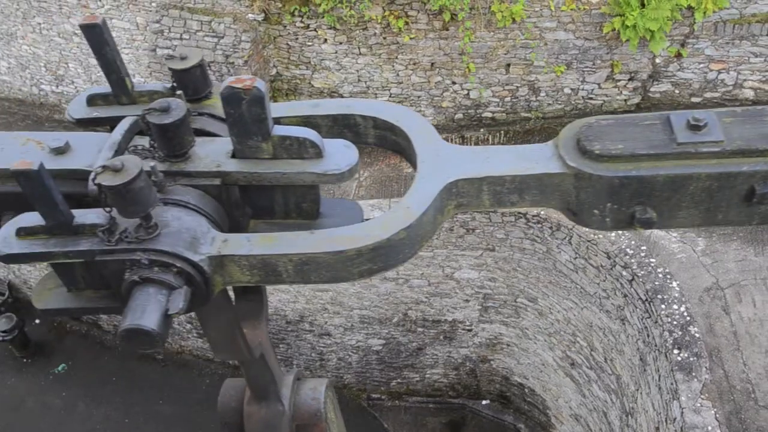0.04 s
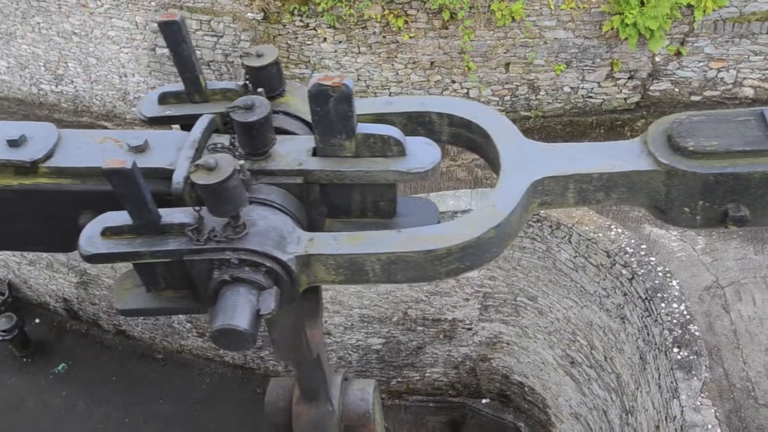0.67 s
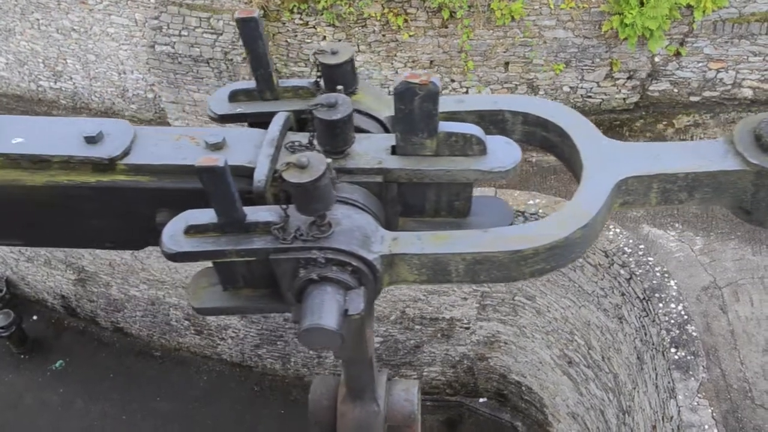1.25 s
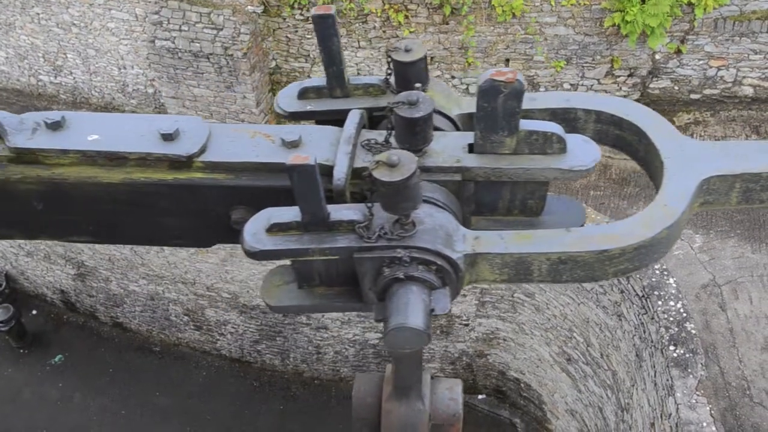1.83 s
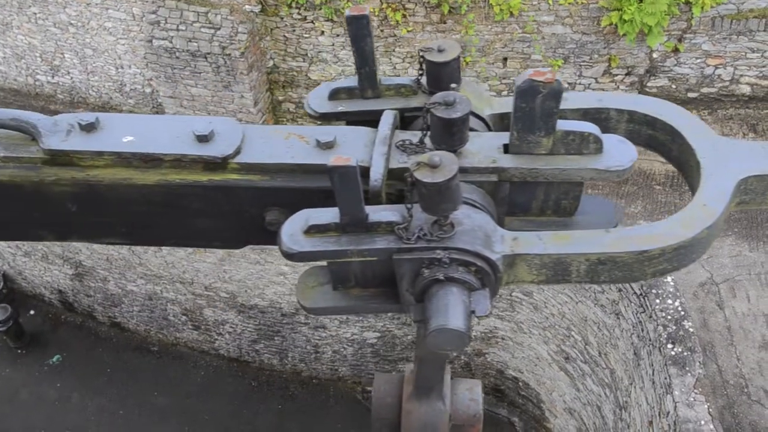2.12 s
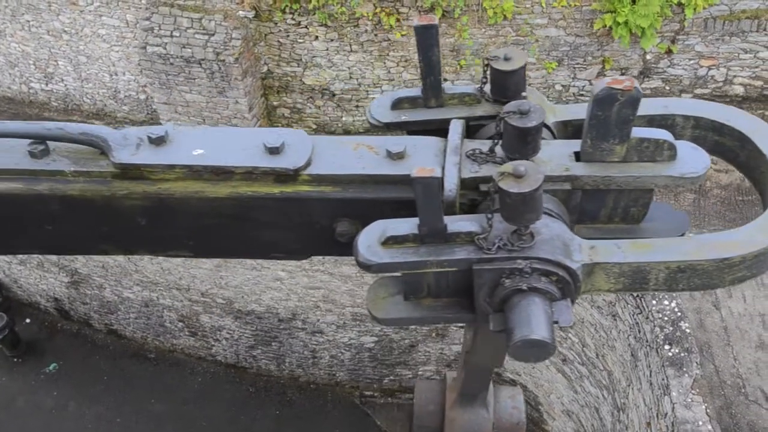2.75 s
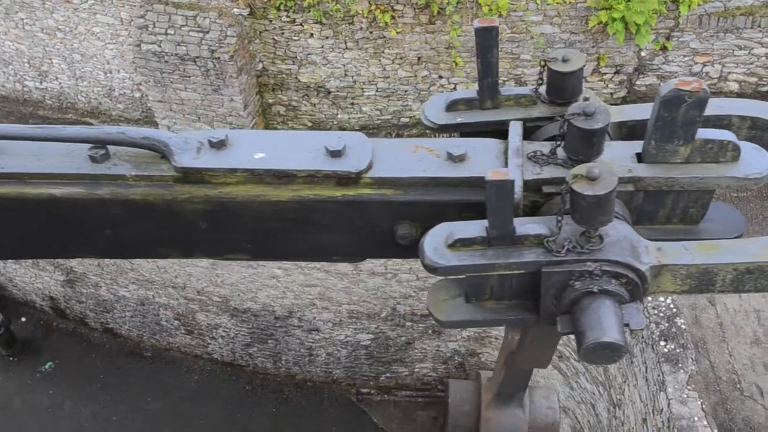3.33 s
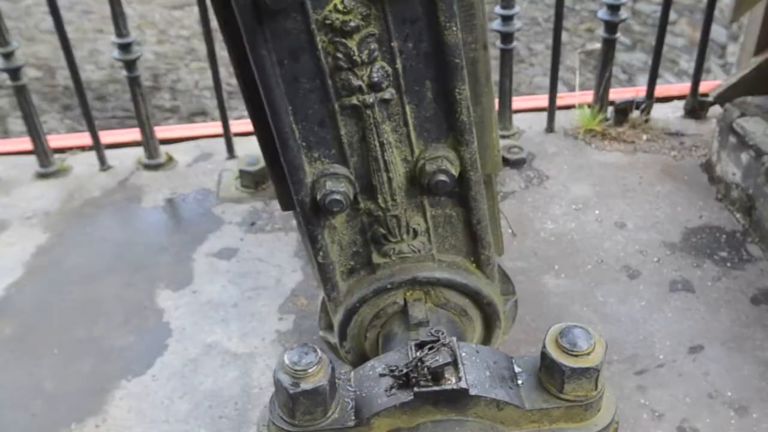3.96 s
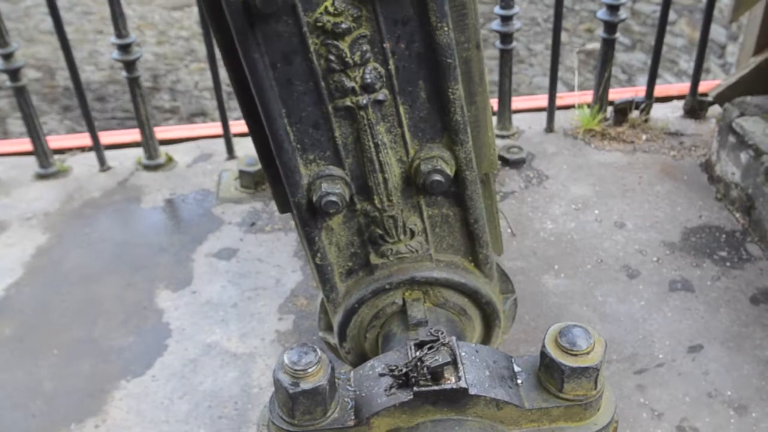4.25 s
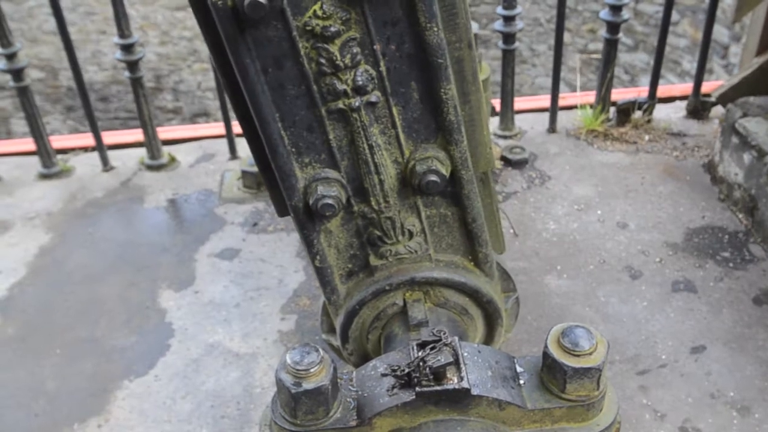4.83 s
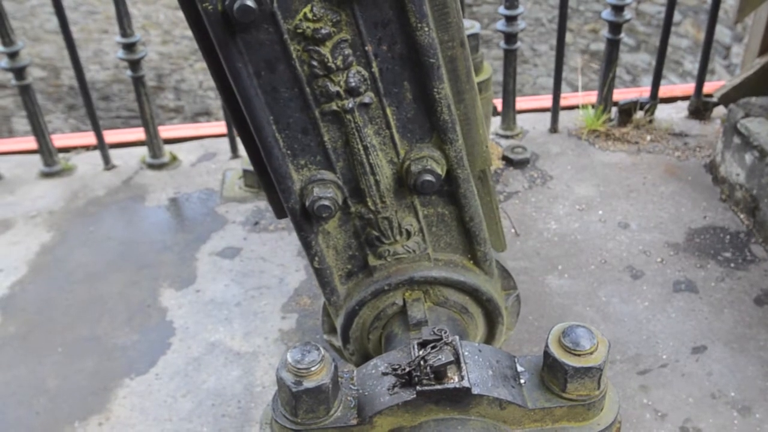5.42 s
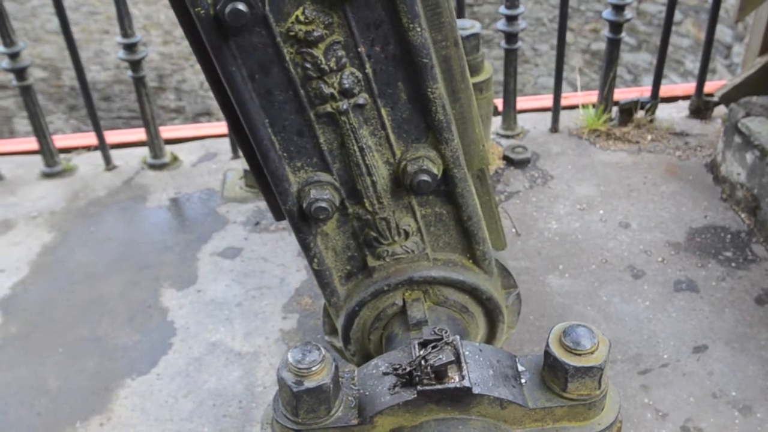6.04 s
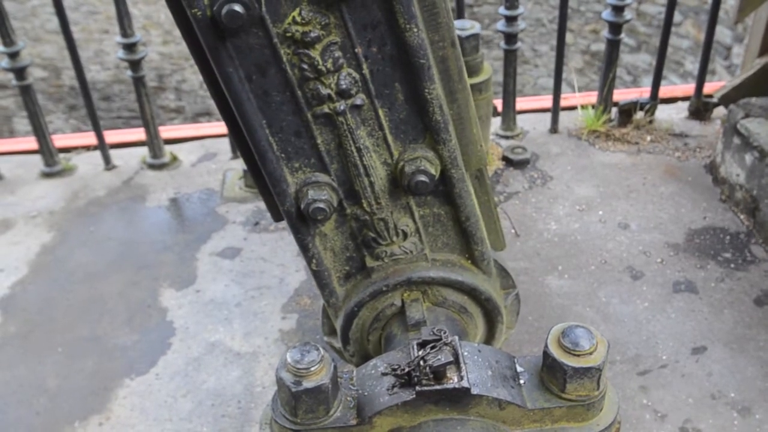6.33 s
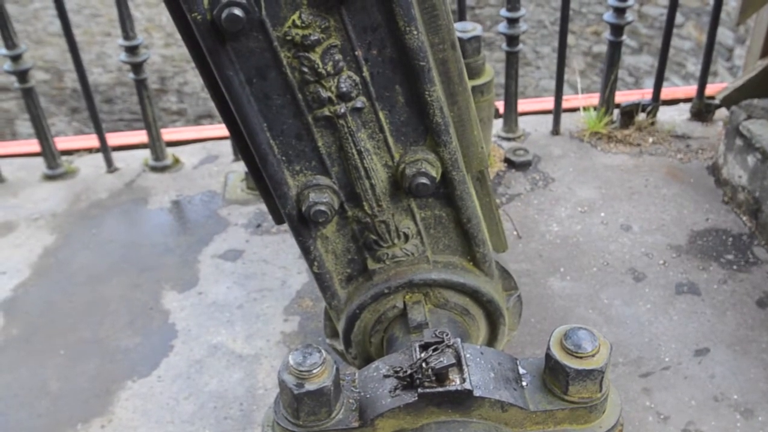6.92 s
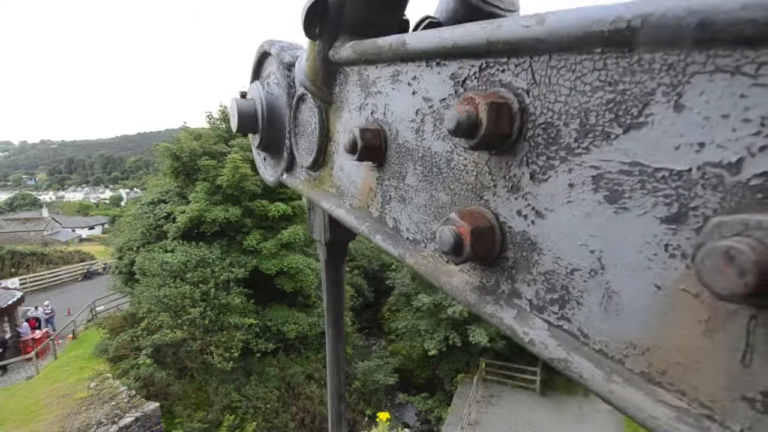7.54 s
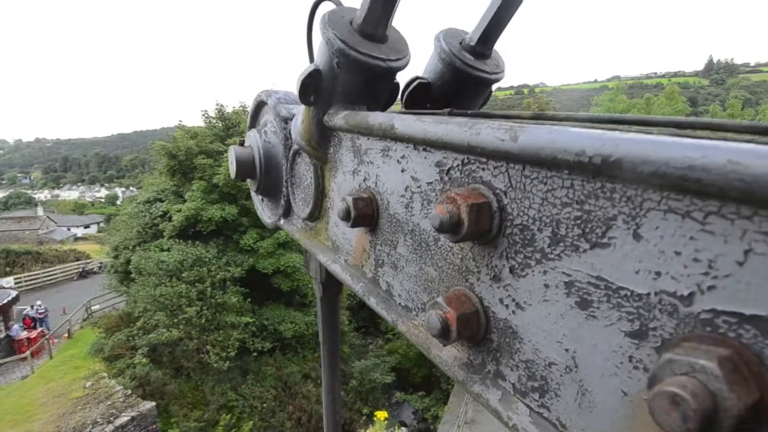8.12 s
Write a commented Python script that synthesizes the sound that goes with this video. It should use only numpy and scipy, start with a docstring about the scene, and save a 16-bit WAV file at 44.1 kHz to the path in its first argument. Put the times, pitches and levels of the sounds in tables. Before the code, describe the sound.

Wind buffets the microphone over a faint rush of water that swells into a bright splashing hiss and finally a fuller, slightly hollow roar.

```python
"""Falling water, a rush of splashes and tiny bubbles, heard from three spots in turn: faint above
a pit, a bright close hiss at a crank's bearing, then a fuller roar with a hollow ring by the beam.
Gusts shed eddies over the port of a single microphone, which flutter and now and then thump."""
import sys
import numpy as np
from scipy import signal
from scipy.fft import rfft, irfft, next_fast_len
from scipy.io import wavfile
from scipy.ndimage import uniform_filter1d

SR = 44100
rng = np.random.default_rng(int(sys.argv[2]) if len(sys.argv) > 2 else 0)


def dump(signal):
    """Clip the signal to [-1, 1] and save it as 16-bit WAV at the path in sys.argv[1]."""
    limited = np.clip(np.atleast_2d(signal).T, -1, 1)
    pcm = np.round(limited * 32767).astype(np.int16)
    wavfile.write(sys.argv[1], SR, pcm)


N = 360738

BEARING_AT_S, BEAM_AT_S, SWITCH_S = 3.52, 7.1, 0.02  # changes of listening spot


def undb(db):
    """Decibels to gain."""
    return 10 ** (np.asarray(db) / 20)


def unit(x):
    """Scale to rms 1."""
    return x / np.sqrt(np.mean(x ** 2))


def ramp(start_s, length_s):
    """Linear rise from 0 to 1."""
    return np.clip((np.arange(N) / SR - start_s) / length_s, 0, 1)


def filtered(x, gain_at):
    """Filter by gain_at(hz)."""
    size = next_fast_len(N + SR // 10)
    hz = np.maximum(np.arange(size // 2 + 1) * SR / size, 1)
    return irfft(rfft(x, size) * gain_at(hz), size)[:N]


def coloured(white, spectrum):
    """Shape white noise of rms 1 to a spectral density."""
    hz, db = np.transpose(spectrum)
    return filtered(white, lambda f: undb(np.interp(np.log(f), np.log(hz), db))) * np.sqrt(SR / 2)


def walk(rate_hz):
    """Smooth random drift, rms 1."""
    return unit(filtered(rng.standard_normal(N), lambda f: np.exp(-(f / rate_hz) ** 2)))


def grains(times_s, hz, size, shape, first_cycle, last_cycle):
    """Sum of short waves, shape(cycles), one around each time."""
    length = ((last_cycle - first_cycle) * SR / hz).astype(int)
    which = np.repeat(np.arange(len(hz)), length)
    step = np.arange(len(which)) - (np.cumsum(length) - length)[which]
    at = ((times_s + first_cycle / hz) * SR).astype(int)[which] + step
    wave = size[which] * shape(first_cycle + step * hz[which] / SR)
    inside = (at >= 0) & (at < N)
    return np.bincount(at[inside], wave[inside], N)


def eddies(times_s, hz, size, reach_cycles=0.61):
    """Pressure of passing vortices: push, then suction, with a weak swing on either side."""
    def swirl(cycles):
        window = np.cos(np.pi * cycles / 4) ** 2
        return -np.sin(2 * np.pi * cycles) / (1 + (cycles / reach_cycles) ** 2) ** 2 * window
    return grains(times_s, hz, size, swirl, -2, 2)


def gust_level_db(breeze_db, sway_db=3.5, attack_s=0.016, release_s=0.025):
    """Gusts build, hold and die away, adding their power to a swaying breeze."""
    # gusts at the microphone: start_s, hold_s, level_db
    gusts = [(0, 0.065, -53), (0.206, .18, -49), (0.418, .12, -50.5), (0.606, 0.15, -55.5),
             (0.862, .055, -52.5), (1.091, 0.17, -53.5), (1.297, 0.043, -51), (1.425, 0.16, -51.5),
             (1.58, 0.16, -54.5), (1.766, .22, -49), (2.193, 0.11, -51.5), (2.337, 0.032, -41),
             (2.463, 0.097, -58), (2.634, 0.2, -54), (2.914, 0.25, -58.5), (3.541, .015, -54.5),
             (4.565, 0.16, -53.5), (5.05, .11, -47.5), (5.202, 0.073, -40.5), (5.443, 0.2, -52),
             (5.754, 0.404, -49.5), (6.435, 0.033, -35), (6.622, 0.046, -46.5), (6.829, 0.045, -29.5),
             (6.921, 0.052, -43.5), (7.496, 0.051, -47), (7.658, 0.046, -52)]
    t = np.arange(N) / SR
    power = undb(breeze_db + sway_db * walk(1.7)) ** 2
    for start_s, hold_s, level_db in gusts:
        fade = np.maximum(start_s - t, 0) / attack_s + np.maximum(t - start_s - hold_s, 0) / release_s
        power = power + (undb(level_db) * np.exp(-np.minimum(fade, 20))) ** 2
    return 10 * np.log10(power)


def wind(breeze_db, eddy_hz, low_cut_hz, quickening, size_spread, pitch_spread,
         rumble_db, rumble_hz, count, reference_db=-50):
    """Eddies over a deep rumble; stronger wind sweeps them past faster, raising the pitch."""
    level_db = gust_level_db(breeze_db)
    late, pitch, strength = rng.standard_normal((count, 3)).T
    times_s = (np.arange(count) + late / 2) * N / SR / count
    excess_db = np.interp(times_s, np.arange(N) / SR, level_db) - reference_db
    hz = eddy_hz * undb(quickening * excess_db) * np.exp(pitch_spread * pitch)
    # large slow eddies press hardest
    size = rng.choice([-1, 1], count) * np.exp(size_spread * strength - pitch_spread * pitch / 2)
    flutter = filtered(eddies(times_s, hz, size), lambda f: f / np.hypot(f, low_cut_hz))
    levelled = flutter / np.sqrt(uniform_filter1d(flutter ** 2, SR // 25) + 1e-9)
    rumble = unit(filtered(rng.standard_normal(N), lambda f: 1 / (1 + (f / rumble_hz) ** 2)))
    return (levelled + undb(rumble_db) * rumble) * undb(level_db)


def buffets(swarm_db=-11, swarm_cycles=1.903, swarm_ratio=1.33, swarm_spread=0.39, count=7):
    """Hard eddies hit the port squarely, each in a swarm of smaller ones."""
    # hardest thumps in the gusts: time_s, level_db, pitch_hz
    thumps = [(.222, -36.5, 272), (.26, -35, 452), (.354, -30.5, 287), (1.183, -35.5, 290), (1.5, -37, 350),
              (1.79, -37, 443), (1.828, -36, 560), (2.33, -35.5, 760), (5.191, -32.5, 211),
              (5.23, -21, 187), (5.274, -27, 171), (5.493, -33, 132), (5.903, -33, 222),
              (5.945, -29.5, 179), (5.975, -30.5, 297), (6.021, -28, 190), (6.096, -28.5, 121),
              (6.161, -30.5, 140), (6.456, -22, 293), (6.866, -17.5, 272), (6.924, -25.5, 145),
              (6.955, -26.5, 145)]
    times_s, level_db, hz = np.transpose(thumps)
    out = eddies(times_s, hz, undb(level_db))
    for late, pitch in rng.standard_normal((len(times_s), 2, count)).T:
        small_hz = hz * swarm_ratio * np.exp(swarm_spread * pitch)
        out = out + eddies(times_s + swarm_cycles * late / hz, small_hz, undb(level_db + swarm_db))
    return out


def hollow(ring_hz, width_hz, wander):
    """Resonance kept ringing by the water; its pitch wanders."""
    hz = ring_hz * (1 + wander * walk(12))
    ring = filtered(rng.standard_normal(N), lambda f: 1 / (1 + (2 * (f - ring_hz) / width_hz) ** 2))
    shift = np.exp(2j * np.pi * np.cumsum(hz - ring_hz) / SR)
    return unit(np.real(signal.hilbert(ring) * shift))


def bubbles(count=20000, low_hz=350, high_hz=7000, ring_cycles=2.9, glide=0.0094):
    """Small bubbles, each ringing a few cycles and rising slightly in pitch."""
    def ring(cycles):
        return np.exp(-cycles / ring_cycles) * np.sin(2 * np.pi * cycles * (1 + glide * cycles))
    when, pitch, strength = rng.random((count, 3)).T
    hz = low_hz * (high_hz / low_hz) ** np.sqrt(pitch)  # mostly small, high ones
    size = np.sqrt(hz) * np.exp(2 * strength)
    return unit(grains(when * N / SR, hz, size, ring, 0, 16))


def rush(bubble_db=-12, surge_db=0.51, surge_hz=3.4, flicker_db=0.5, flicker_hz=14):
    """Spray and bubbles of an uneven fall: the whole surges, each octave flickers by itself."""
    splash = rng.standard_normal(N) + undb(bubble_db) * bubbles()
    octaves = np.log2(125 * 2 ** np.arange(8))
    out = 0
    for weights in np.eye(len(octaves)):
        band = filtered(splash, lambda f: np.interp(np.log2(f), octaves, weights))
        out = out + band * undb(flicker_db * walk(flicker_hz))
    return unit(out * undb(surge_db * walk(surge_hz)))


def spot_gains(bearing_rise_s=0.41, bearing_start_gain=0.02, beam_rise_s=0.35, beam_start_gain=0.29):
    """Gains of pit, bearing and beam; each new spot starts low and swells to full."""
    left_pit = ramp(BEARING_AT_S, bearing_rise_s)
    at_bearing = ramp(BEARING_AT_S - SWITCH_S, SWITCH_S)
    at_beam = ramp(BEAM_AT_S - SWITCH_S, SWITCH_S)
    bearing = bearing_start_gain + (1 - bearing_start_gain) * left_pit
    beam = beam_start_gain + (1 - beam_start_gain) * ramp(BEAM_AT_S, beam_rise_s)
    return 1 - left_pit, at_bearing * bearing * (1 - at_beam), at_beam * beam


def water(ring_db=-43, gurgle_db=-52, gurgle_at_s=4.2, gurgle_width_s=0.26):
    """One fall, coloured by each spot; hollow briefly at the bearing, steadily at the beam."""
    # water spectrum at each spot: frequency_hz, density_db_per_hz
    pit_spectrum = [(30, -99), (100, -95), (400, -97.5), (1000, -98), (2000, -99), (2850, -95.5),
                    (3500, -98.5), (4300, -102.5), (6300, -107), (8500, -110), (10500, -120), (13000, -136)]
    bearing_spectrum = [(25, -89), (60, -105), (210, -81), (400, -82), (1100, -80.5), (2000, -78.5),
                        (2850, -73), (3350, -78.5), (4300, -77), (5200, -82), (6300, -83.5), (7500, -88),
                        (10500, -95), (15500, -115)]
    beam_spectrum = [(25, -99), (60, -85.5), (150, -73.5), (400, -72), (600, -70.5), (1000, -72),
                     (1700, -72), (3300, -76), (4400, -76.5), (6000, -85), (8500, -86.5), (10000, -91.5),
                     (13000, -111), (15500, -121)]
    pit, bearing, beam = spot_gains()
    fall = rush()
    swell = np.exp(-((np.arange(N) / SR - gurgle_at_s) / gurgle_width_s) ** 2)
    gurgle = undb(gurgle_db) * swell * hollow(ring_hz=1136, width_hz=190, wander=0.015)
    ring = undb(ring_db) * hollow(ring_hz=1348, width_hz=250, wander=0.02208)
    hiss = coloured(fall, bearing_spectrum) + gurgle
    roar = coloured(fall, beam_spectrum) + ring
    return pit * coloured(fall, pit_spectrum) + bearing * hiss + beam * roar


def scene():
    """Water and wind, dual mono; away from the pit the eddies are larger and slower."""
    sheltered = wind(breeze_db=-66, eddy_hz=239, low_cut_hz=190, quickening=0.23, size_spread=0.57,
                     pitch_spread=0.44, rumble_db=-14.5, rumble_hz=75, count=3200)
    exposed = wind(breeze_db=-63, eddy_hz=119, low_cut_hz=78, quickening=0.22, size_spread=0.51,
                   pitch_spread=0.58, rumble_db=-12.5, rumble_hz=70, count=1600)
    in_open = ramp(BEARING_AT_S - SWITCH_S, SWITCH_S)
    mono = water() + (1 - in_open) * sheltered + in_open * exposed + buffets()
    return np.array([mono, mono])


def duct_gain(hz):
    """Response of the microphone duct: narrow notches."""
    # duct notches: centre_hz, width_hz, depth_db
    notches = [(5690, 424, -28), (6980, 330, -9), (15020, 500, -24)]
    gain = 1
    for centre_hz, width_hz, depth_db in notches:
        detuning = 2j * (hz - centre_hz) / width_hz
        gain = gain * (detuning + undb(depth_db)) / (detuning + 1)
    return gain


def record(dry, low_cut_hz=30, high_cut_hz=15720):
    """Microphone: duct colour, then low and high cuts."""
    sound = np.array([filtered(channel, duct_gain) for channel in dry])
    sound = signal.sosfilt(signal.butter(2, low_cut_hz, "high", fs=SR, output="sos"), sound)
    return signal.sosfilt(signal.ellip(10, 0.2, 70, high_cut_hz, fs=SR, output="sos"), sound)


dry = scene()
out = record(dry)
dump(out)
```